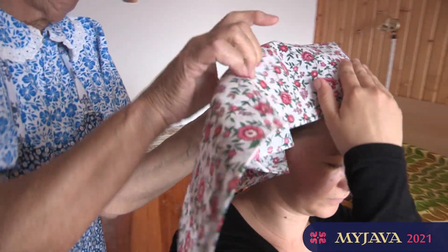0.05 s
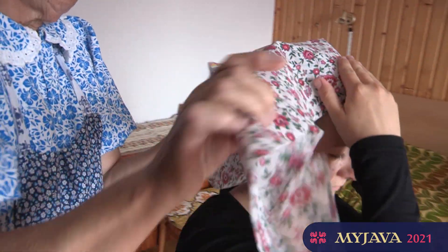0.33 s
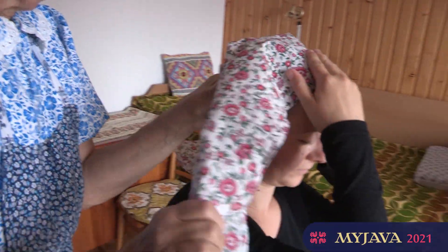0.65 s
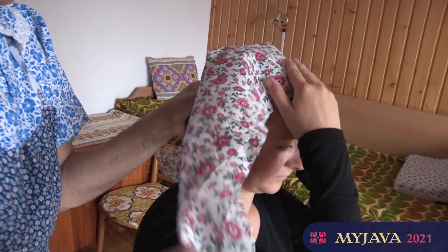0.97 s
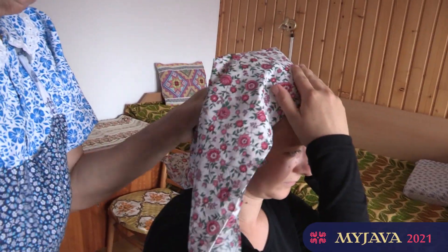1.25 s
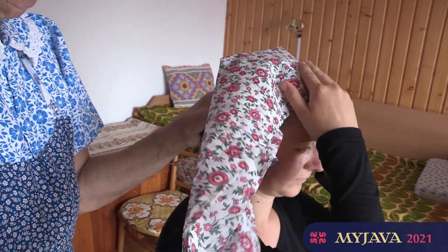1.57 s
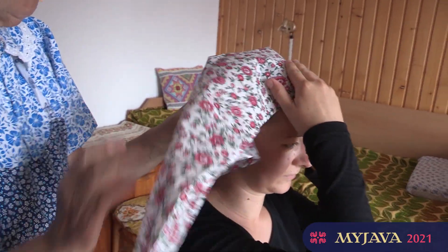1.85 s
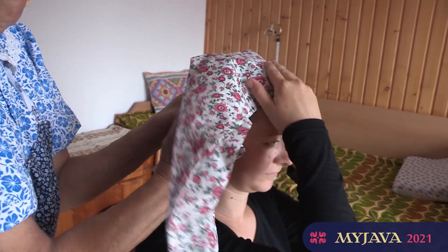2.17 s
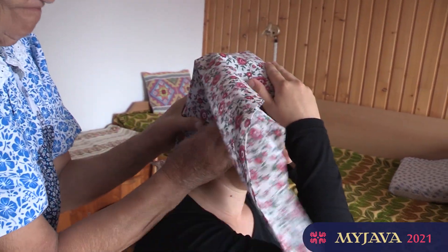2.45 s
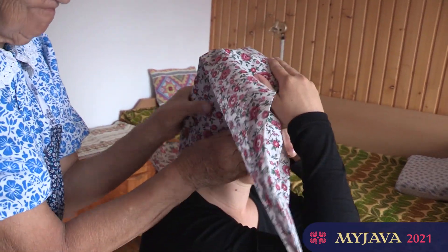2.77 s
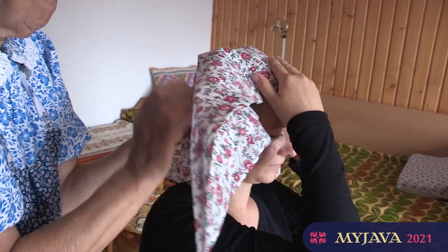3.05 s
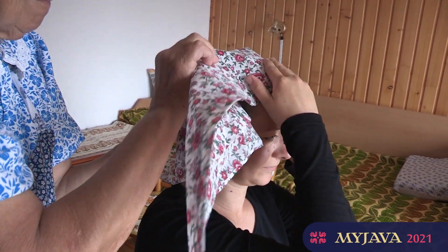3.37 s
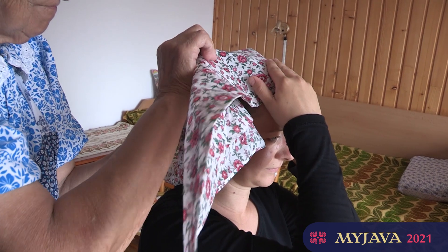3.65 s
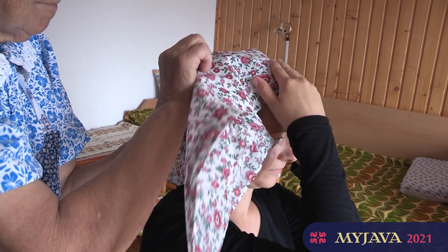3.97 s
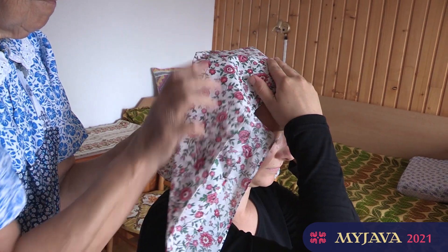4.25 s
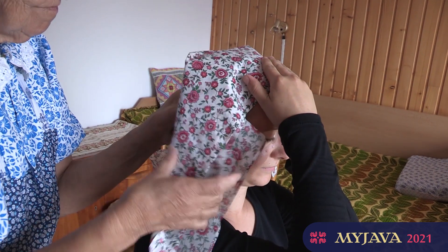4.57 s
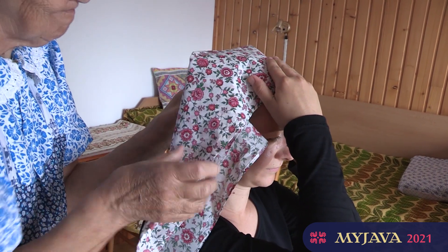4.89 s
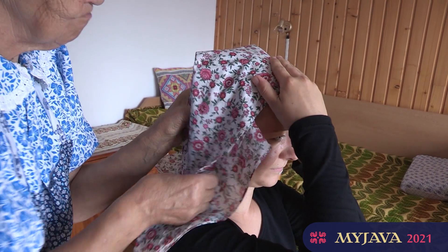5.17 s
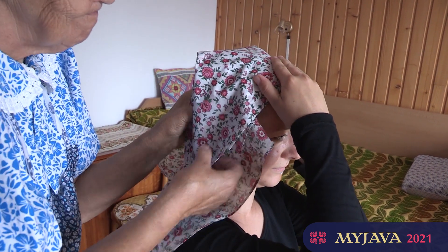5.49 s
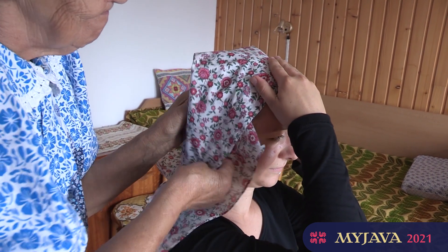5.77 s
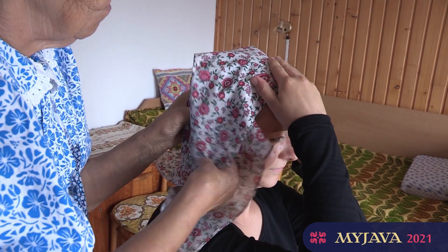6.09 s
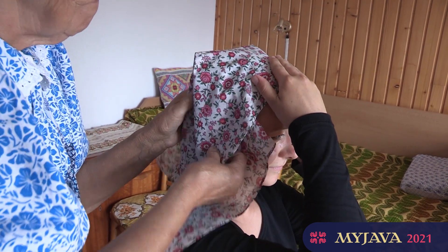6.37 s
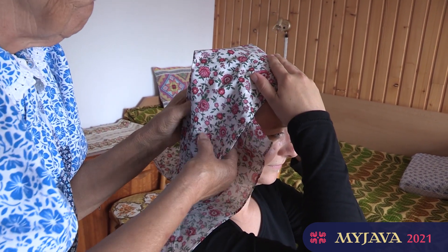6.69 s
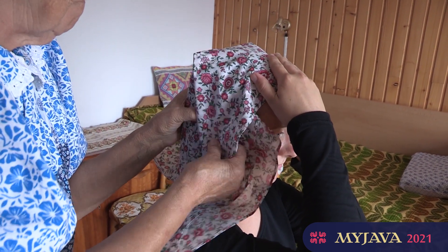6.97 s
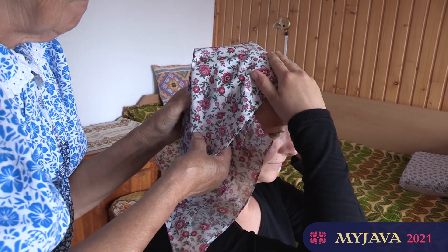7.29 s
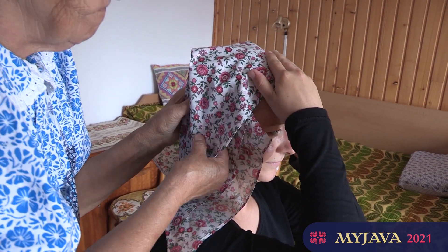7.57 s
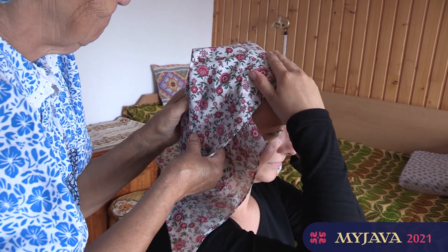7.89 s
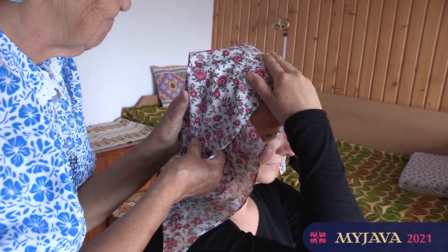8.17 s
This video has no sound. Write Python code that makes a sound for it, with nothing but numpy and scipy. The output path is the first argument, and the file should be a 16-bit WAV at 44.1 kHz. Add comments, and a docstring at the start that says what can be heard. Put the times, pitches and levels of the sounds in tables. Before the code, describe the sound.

In a small, quiet room, stiff cloth crinkles close by, then one sharp wooden clack rings briefly, much louder than anything else. Hands go on folding and smoothing the cotton headscarf in gentle swishes, with tiny snaps of creases, soft puffs of air and a few dull bumps. In the last seconds the faint rush and low drone of a distant vehicle grow through the walls.

```python
"""A starched cotton headscarf is smoothed, folded and tucked round a head in a small wood-panelled room.
Stick-slip friction of its threads hisses, stiff creases buckle with a snap, and pats push out soft puffs
of air. Moving bodies bump dully over a low room noise. Early on, something hard and wooden clacks and
settles elsewhere in the room, ringing in its modes. Towards the end a distant vehicle draws nearer
outside, with a rush, a tyre note and an engine drone."""
import sys
import numpy as np
from scipy import signal
from scipy.fft import rfft, irfft, next_fast_len
from scipy.io import wavfile
from scipy.ndimage import uniform_filter1d

SR = 44100
rng = np.random.default_rng(int(sys.argv[2]) if len(sys.argv) > 2 else 0)


def unload_wav(signal):
    """Save mono or channel-first audio to the path in sys.argv[1] as 16-bit WAV at rate SR, clipped to [-1, 1]."""
    wavfile.write(
        sys.argv[1],
        SR,
        np.round(np.clip(np.atleast_2d(signal).T, -1, 1) * 32767).astype(np.int16),
    )


N = 363560
TIME = np.arange(N) / SR
TOP_HZ = 15750

# spectrum of the cloth's hiss as the microphone picks it up: frequency_hz, gain_db
HISS_SPECTRUM = [(200, -14), (1500, -18), (3000, -3), (4200, -3), (5500, 0.5), (7500, -6.5), (11800, -7.5),
                 (13000, -16), (14400, -9), (16000, -14)]


def undb(db):
    """Decibels to amplitude ratio."""
    return 10 ** (np.asarray(db) / 20)


def unit(x):
    """Normalisation to rms 1."""
    return x / np.sqrt(np.mean(x ** 2) + 1e-18)


def curve(table):
    """Linear interpolation of (time_s, value) rows, one value per sample."""
    return np.interp(TIME, *np.transpose(table))


def add(out, start_s, x):
    """Superposition of x on out from start_s on."""
    i = int(np.clip(start_s * SR, 0, N - 1))
    out[i:i + len(x)] += x[:N - i]


def band(x, low_hz, high_hz):
    """Causal band-pass filter."""
    return signal.sosfilt(signal.butter(2, [low_hz, high_hz], "band", fs=SR, output="sos"), x)


def high_pass(x, hz):
    """Causal high-pass filter."""
    return signal.sosfilt(signal.butter(2, hz, "high", fs=SR, output="sos"), x)


def colour(x, points, size=4096):
    """Minimum-phase filter through (frequency_hz, gain_db) points, made by folding the cepstrum."""
    hz, db = np.transpose(points)
    grid = np.maximum(np.arange(size // 2 + 1) * SR / size, 1)
    cepstrum = irfft(np.log(undb(np.interp(np.log(grid), np.log(hz), db))))
    cepstrum[1:size // 2] *= 2
    cepstrum[size // 2 + 1:] = 0
    return signal.fftconvolve(x, irfft(np.exp(rfft(cepstrum))))[:len(x)]


def wander(rate_hz):
    """Smooth random modulation of rms 1."""
    hold = int(SR / rate_hz)
    steps = np.repeat(rng.standard_normal(N // hold + 1), hold)
    return unit(uniform_filter1d(steps, hold)[:N])


def effort_db():
    """Level envelope of the hands' activity between strokes."""
    # how busily the hands shift on the cloth: time_s, effort_db
    activity = [(0, 5.5), (.42, 8), (.57, 1), (.95, -5), (1.33, 4.5), (1.48, -2), (2.05, -6), (2.8, -2.5),
                (3.85, -8), (4.4, 2.5), (4.85, -0.5), (5.01, -10), (5.2, 3), (5.68, 3.5), (6.05, -6),
                (6.63, 1.5), (6.87, -2.5), (8.24, -5)]
    return curve(activity)


def slips(per_s, spread_db):
    """Stick-slip as a random impulse train: most slips are tiny, a few large."""
    size = undb(spread_db * np.minimum(rng.exponential(size=N), 5))
    return unit((rng.random(N) < per_s / SR) * size * rng.choice([-1, 1], N))


def shifting_folds(x, depth_db=2.0, rate_hz=14, bands=9):
    """Time-varying filtering: as the folds change shape, each band swells and fades on its own."""
    size = next_fast_len(N, True)
    spectrum = rfft(x, size)
    hz = np.arange(len(spectrum)) * SR / size
    centres_hz = np.geomspace(1000, TOP_HZ, bands)
    parts = (irfft(spectrum * np.interp(hz, centres_hz, weights), size)[:N] for weights in np.eye(bands))
    return unit(sum(part * undb(depth_db * wander(rate_hz)) for part in parts))


def crackle(per_s, spread_db, decay_s, band_hz):
    """Small wrinkles release elastic energy, each in an exponentially decaying burst of noise."""
    releases = np.abs(slips(per_s, spread_db))
    envelope = signal.lfilter([1], [1, -np.exp(-1 / (decay_s * SR))], releases)
    return unit(band(envelope * rng.standard_normal(N), *band_hz))


def rubbing(rise=0.59, fall=0.44, steepness=2.2, grip_db=1.67):
    """Stick-slip friction: threads catch and slip, and wrinkles crackle, more often at higher speed."""
    # strokes of cloth over cloth: peak_s, length_s, hiss_db, rasp_relative_db
    strokes = [(0.467, 0.037, -53.5, 1), (0.831, 0.15, -60, 3.5), (1.15, 0.14, -62.5, -9),
               (1.229, 0.038, -58.5, -3), (1.29, 0.048, -56, -6), (1.363, .025, -59.5, -1),
               (2.196, 0.037, -62.5, 7), (2.283, 0.17, -61, 2.5), (2.503, 0.13, -58.5, -1.5),
               (2.701, 0.11, -60, 1), (2.933, 0.068, -63.5, -13), (4.487, 0.073, -61.5, 5.5),
               (4.593, .021, -57, -10), (4.708, 0.033, -62.5, 4), (4.86, 0.067, -63, 4),
               (5.33, 0.1, -58, 1), (5.857, 0.058, -54.5, 0.5), (5.942, 0.026, -58, 5),
               (5.997, 0.071, -55.5, 0), (6.12, 0.028, -58.5, 1.5), (6.182, 0.054, -57.5, 5.5),
               (6.47, 0.13, -64.5, 4), (7.008, 0.08, -60.5, 0.5), (7.144, 0.05, -59, -0.5),
               (7.253, 0.084, -65, 1.5)]
    # spectrum of the rasping weave: frequency_hz, gain_db
    rasp_spectrum = [(60, -9), (130, -4), (500, 2.5), (1000, 0.5), (1600, 1), (2500, 1), (3400, -6),
                     (5000, -12.5), (9000, -36)]
    base_hiss = undb(-68 + effort_db())
    hiss_power = base_hiss ** 2
    rasp_power = undb(-63.5 + 0.47 * effort_db()) ** 2
    for peak_s, length_s, hiss_db, rasp_relative_db in strokes:
        width_s = length_s * np.where(TIME < peak_s, rise, fall)  # speeds up more slowly than it stops
        swell = np.exp(-(np.abs(TIME - peak_s) / width_s) ** steepness)
        hiss_power += swell * undb(hiss_db) ** 2
        rasp_power += swell * undb(hiss_db + rasp_relative_db) ** 2
    speed = (hiss_power / hiss_power.max()) ** 0.25
    hiss = shifting_folds(colour(slips(12000 * speed, spread_db=0.9), HISS_SPECTRUM))
    rasp = shifting_folds(colour(slips(9000 * speed, spread_db=2.2), rasp_spectrum))
    wrinkles = crackle(150 * speed, spread_db=1.8, decay_s=0.0012, band_hz=(880, 4050))
    ticks = crackle(90 * speed, spread_db=1.5, decay_s=0.0008, band_hz=(1600, 6800))
    grip = undb(grip_db * wander(rate_hz=70))
    sliding = undb(-2) * np.sqrt(hiss_power) * hiss + undb(-1) * np.sqrt(rasp_power) * rasp
    crackle_gain = np.sqrt(base_hiss * np.sqrt(hiss_power))  # a stroke lifts it half as many dB as hiss
    return grip * sliding + crackle_gain * (undb(-3) * wrinkles + undb(-5) * ticks)


def room_noise(steady_db=-61, shuffle_db=-52.5, fade_db_per_s=6):
    """Incoherent sources add in power: the steady room, a fading shuffle and swishing sleeves."""
    # spectrum of the low indoor noise: frequency_hz, gain_db
    spectrum = [(20, -25), (65, -5), (150, 1.5), (340, 1.5), (600, -3), (950, -3.5), (2000, -14),
                (5000, -21), (16000, -29)]
    shuffle = undb(shuffle_db - fade_db_per_s * TIME)
    sleeves = undb(-61.5 + 0.64 * effort_db())
    envelope = np.sqrt(undb(steady_db) ** 2 + shuffle ** 2 + sleeves ** 2)
    return unit(colour(rng.standard_normal(N), spectrum)) * envelope * undb(wander(rate_hz=12))


def creases(lead_s=0.00038, decay_s=0.0014, stretch_per_db=0.19, tail=0.17, tail_s=0.01, spread=0.17):
    """Buckling: a stiff fold gives way in a brief burst with a snap, a hollow body and a crisp edge."""
    # the larger creases snapping: peak_s, level_db, body_relative_db, edge_relative_db
    buckles = [(0.038, -40, 2.5, -7), (0.2742, -53.5, -6, -10), (0.454, -48, 5.5, -3),
               (.4902, -46.5, -10, -3), (.518, -48, 2, -9), (1.059, -50, -11, -6), (1.2795, -51.5, 7.5, 2),
               (1.634, -57, -1, -4), (1.9753, -51.5, -1, -12), (2.1705, -53, -2, -11),
               (2.1859, -47.5, 1, -8), (2.4998, -50.5, -5, -3), (2.543, -53, -1, -7),
               (2.686, -48.5, 0, -14), (2.812, -57.5, 2, -8), (2.883, -54.5, -12, -2),
               (3.18, -51, -2.5, -7), (3.9645, -53, -11, -11), (4.2114, -58, 5, 0), (4.363, -53.5, 4, -3.5),
               (4.403, -53.5, 10, 0.5), (4.444, -48.5, -3, -7), (4.587, -48.5, -1, -8),
               (4.6188, -52, 1.5, -4), (4.706, -56, 2, -6), (4.7705, -52, 1.5, -8), (4.8678, -48, -3, 0.5),
               (5.1015, -55.5, 2, -4.5), (5.169, -51.5, -0.5, -8), (5.221, -45, -5, 0),
               (5.4832, -48.5, -16.5, -7), (6.4026, -49, -4, -5.5), (6.438, -55, 5.5, 0),
               (6.494, -51.5, 2, -2.5), (6.5421, -57, 1, -4), (6.972, -45.5, 1.5, -4.5),
               (7.326, -51, -16, -3.5), (7.3651, -55, 1, -18), (7.8333, -49, -1, 0.5)]
    out, t = np.zeros(N), TIME[:SR // 20] - 0.005
    for peak_s, level_db, body_db, edge_db in buckles:
        pitch_ratio = np.exp(spread * (2 * rng.random() - 1))
        release_s = decay_s * np.exp(stretch_per_db * body_db)  # big hollow folds take longer
        release = np.exp(-np.abs(t) / release_s) + tail * np.exp(-np.abs(t) / tail_s)
        envelope = np.where(t < 0, np.exp(-np.abs(t) / lead_s), release)
        bursts = rng.standard_normal((3, len(t))) * envelope
        snap = unit(band(bursts[0], 1500 * pitch_ratio, 3500 * pitch_ratio))
        body = unit(band(bursts[1], 244 * pitch_ratio, 1240 * pitch_ratio))
        edge = unit(band(colour(bursts[2], HISS_SPECTRUM), 3200, 13500))
        grain = snap + undb(body_db) * body + undb(edge_db) * edge
        add(out, peak_s + t[0], undb(level_db) * grain / np.sqrt(10))  # energy lies in a tenth of it
    return out


def pats():
    """Air displacement: patted or flapping, slack cloth pushes out a soft, low puff."""
    # pats and flaps of the scarf: peak_s, level_db, length_s
    puffs = [(0.484, -47.5, 0.079), (1.294, -49, 0.05), (2.334, -59, 0.15), (3.007, -59.5, 0.27),
             (4.454, -58.5, 0.15), (6.973, -54, 0.028)]
    # spectrum of a puff of air: frequency_hz, gain_db
    spectrum = [(30, -13), (70, -2.5), (160, 2.5), (260, -6), (600, -8), (2000, -36)]
    swell = sum(undb(db) * np.exp(-(2 * (TIME - peak_s) / length_s) ** 2) for peak_s, db, length_s in puffs)
    return swell * unit(colour(rng.standard_normal(N), spectrum))


def clacks(chatter_s=0.0033, body_hz=1400, ring_t60_s=0.26, room_t60_s=0.3):
    """Impact excitation: short hard contacts ring the damped modes of a wooden body and fill the room."""
    # the wood touches, clacks home and settles: start_s, level_db, low_relative_db, room_relative_db
    contacts = [(.585, -52, -4.5, 15), (.611, -42, 1.5, 13), (0.6253, -32.5, 0, 7), (0.629, -20.5, -5, 1.5),
                (.992, -41.5, -28, 5), (1.041, -42, -25, 4.5)]
    # modes of the wooden body: frequency_hz, relative_db
    modes = [(168, -0.5), (340, -4), (447, 3.5), (522, 1), (910, -4), (1005, -8), (1043, 1), (1142, 1),
             (1800, -6), (2002, -4), (2080, -2.5), (2202, -5)]
    # spectrum of a contact and its echoes: frequency_hz, gain_db
    spectrum = [(40, -30), (120, -16), (170, 0), (320, 0), (750, -2.5), (1000, 2), (1360, -3.5), (2200, -6),
                (3400, -12), (4100, -19), (8750, -30), (16000, -41)]
    out, t = np.zeros(N), TIME[:SR // 2]
    room_decay = undb(-60 * t / room_t60_s) * (1 - np.exp(-t / 0.002))
    for start_s, level_db, low_db, room_db in contacts:
        noise = rng.standard_normal((2, len(t)))
        chatter = 0.23 * noise[0] * np.exp(-t / chatter_s)
        crack = unit(colour((t == 0) + chatter, spectrum))  # one impulse, then the surfaces chatter
        echoes = unit(colour(noise[1] * room_decay, spectrum))
        tones = sum(undb(db) * np.sin(2 * np.pi * hz * t) * rng.choice([-1, 1]) for hz, db in modes)
        ring = unit(tones * undb(-60 * t / ring_t60_s))
        blow = undb(level_db) * (undb(-1) * crack + undb(-2) * ring + undb(room_db - 1) * echoes) / 10
        # light touches hardly move the heavy body
        add(out, start_s, undb(low_db) * blow + (1 - undb(low_db)) * high_pass(blow, body_hz))
    return out


def thud(landing_s=0.6277, peak_db=-17.5, push_s=0.00036, low_hz=130):
    """A band-limited force pulse: one rounded push as the wood lands, and its rebound."""
    push = band(np.exp(-((TIME - landing_s) / push_s) ** 2), low_hz, TOP_HZ)
    return undb(peak_db) * push / np.abs(push).max()


def bumps(attack_s=0.0055, decay_s=0.01):
    """Heavily damped oscillation: a soft knock sets off a few low cycles."""
    # dull bumps of the moving bodies: start_s, level_db, pitch_hz
    knocks = [(0.692, -42, 112), (5.721, -50.5, 106), (6.333, -54, 92), (7.827, -49.5, 175)]
    out, t = np.zeros(N), TIME[:SR // 2]
    swell = (1 - np.exp(-(t / attack_s) ** 2)) * np.exp(-t / decay_s)
    for start_s, level_db, pitch_hz in knocks:
        add(out, start_s, undb(level_db) * swell / swell.max() * np.sin(2 * np.pi * pitch_hz * t))
    return out


def vehicle_rush():
    """Level rises as distance falls: the wavering broadband noise of an approaching vehicle."""
    # the vehicle draws nearer: time_s, level_db
    approach = [(0, -78), (5, -68), (5.6, -63), (7.5, -61.5), (8.24, -57.5)]
    # spectrum of its rush: frequency_hz, gain_db
    spectrum = [(150, -13), (550, -17.5), (740, -6), (880, -3), (1000, -5), (1300, -3.5), (1500, -5),
                (1900, -18.5), (4000, -43.5)]
    return unit(colour(rng.standard_normal(N), spectrum)) * undb(curve(approach) + wander(rate_hz=7.6))


def tyre_whine(pitch_hz=1197, drift=0.009, level_db=-69, start_s=6.1, rise_s=0.12):
    """Random frequency and amplitude modulation: the tyres sing a narrow, wavering note."""
    phase = 2 * np.pi * np.cumsum(pitch_hz * (1 + drift * wander(rate_hz=6))) / SR
    note = unit(np.sin(phase) * undb(5.6 * wander(rate_hz=12)))
    return undb(level_db) * note * np.clip((TIME - start_s) / rise_s, 0, 1)


def engine(pitch_hz=86, drift=0.0443, nearest_db=-61.5, rise_db_per_s=9):
    """A harmonic series, strongest on the second: the engine's drone grows through the walls."""
    phase = 2 * np.pi * np.cumsum(pitch_hz * (1 + drift * wander(rate_hz=18))) / SR
    drone = unit(0.5 * np.sin(phase) + np.sin(2 * phase) + 0.5 * np.sin(3 * phase))
    level_db = nearest_db - rise_db_per_s * (TIME[-1] - TIME)
    return drone * undb(level_db + 3.1 * wander(rate_hz=18))


def reverberation(x, low_t60_s=0.29, high_t60_s=0.075, split_hz=3000):
    """A diffuse field: convolution with a noise tail of unit energy whose treble dies first."""
    t = TIME[:SR // 2]
    noise = rng.standard_normal(len(t))
    low = band(noise, 29, split_hz)
    tail = low * undb(-60 * t / low_t60_s) + (noise - low) * undb(-60 * t / high_t60_s)
    tail *= 1 - np.exp(-(t / 0.0027) ** 2)  # the first walls take a moment to answer
    return signal.fftconvolve(x, tail / np.linalg.norm(tail))[:N]


def scene():
    """Superposition in one channel; the cloth is close, so its direct sound outweighs the room."""
    cloth = rubbing() + creases() + pats() + bumps()
    indoors = cloth + undb(-16) * reverberation(cloth) + clacks() + thud() + room_noise()
    outdoors = vehicle_rush() + tyre_whine() + engine()
    return (indoors + outdoors)[None]


def record(dry):
    """Band limiting: the microphone rolls off the deepest bass and the recorder cuts the top."""
    thinned = high_pass(dry, hz=26)
    return signal.sosfilt(signal.ellip(10, 0.2, 70, TOP_HZ, fs=SR, output="sos"), thinned)


dry = scene()
out = record(dry)
unload_wav(out)
```